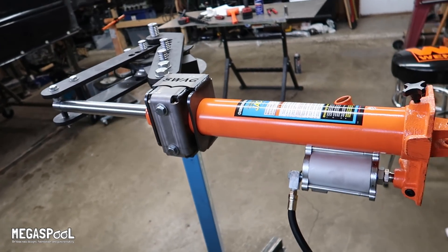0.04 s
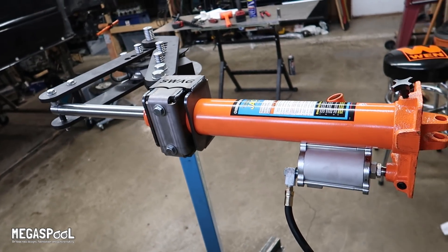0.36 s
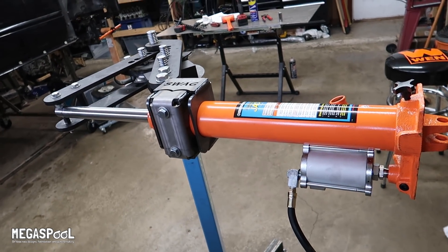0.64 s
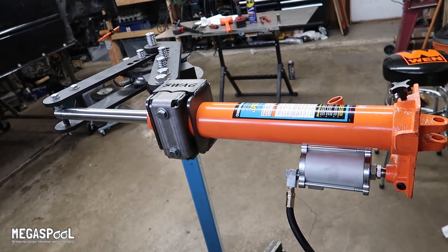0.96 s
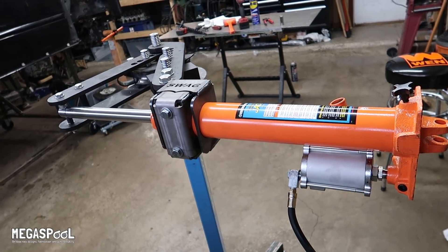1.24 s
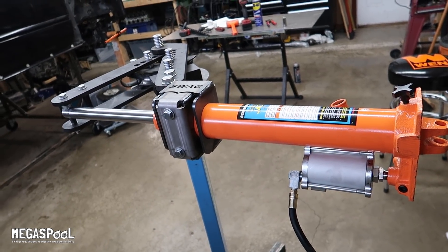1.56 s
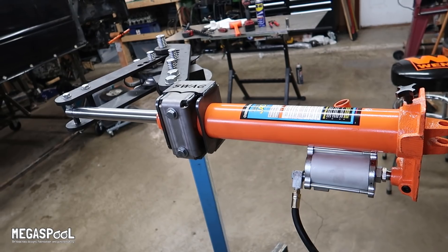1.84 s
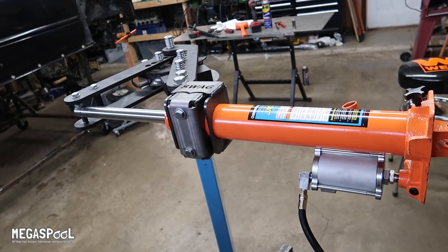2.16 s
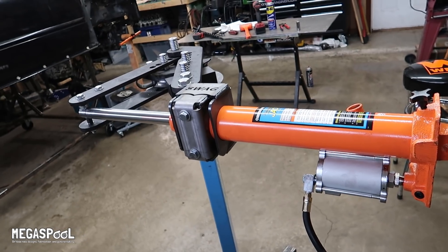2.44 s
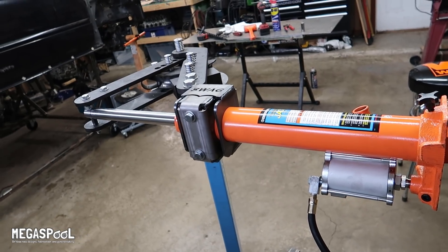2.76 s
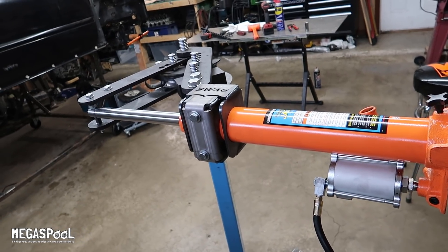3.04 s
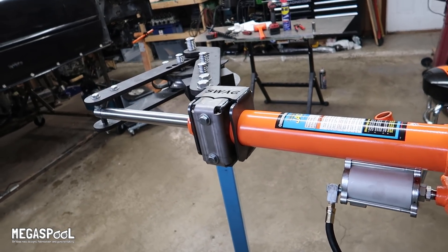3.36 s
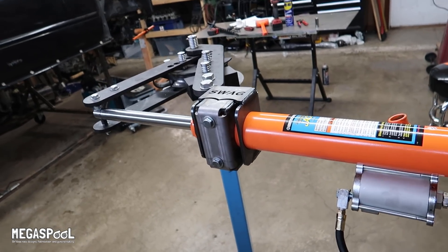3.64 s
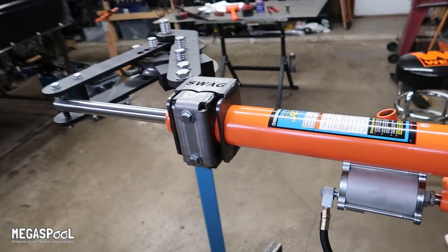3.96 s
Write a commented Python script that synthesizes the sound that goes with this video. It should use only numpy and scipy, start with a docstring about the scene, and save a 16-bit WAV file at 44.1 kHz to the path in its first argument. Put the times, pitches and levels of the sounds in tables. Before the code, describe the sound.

An air-driven hydraulic pump is already running loudly close by, at nearly ten strokes a second, each a sharp hiss of air with thumps and a small knock. It slows very slightly, echoing in a garage, and stops abruptly at about 3.6 seconds. The room rings out briefly. Near 3.8 seconds a small steel part pings faintly, followed by a soft rustle over a quiet workshop hum.

```python
"""Air-driven hydraulic pump in a garage

The pump pushes a tube bender's ram at nearly ten strokes a second, slowing a little under load. Each stroke
dumps its air with a sharp hiss and a thump; the piston flies back with a second thump, a rising gulp and a
knock. The pump stops, the room rings out, and a small steel part pings over the workshop's hum, while faint
midrange noise slowly rises."""
import sys
import numpy as np
from scipy import signal
from scipy.fft import rfft, irfft
from scipy.io import wavfile

SR = 44100
rng = np.random.default_rng(int(sys.argv[2]) if len(sys.argv) > 2 else 0)


def generate_wav(sig):
    """Save sig (samples, or channels by samples) to the path in sys.argv[1] as 16-bit PCM at SR."""
    pcm = np.round(np.clip(np.atleast_2d(sig).T, -1, 1) * 32767).astype(np.int16)
    wavfile.write(sys.argv[1], SR, pcm)


N = 176400
LEAD = SR // 4  # run-in samples: the pump is already going
T = np.arange(-LEAD, N) / SR
HZ = np.maximum(np.fft.rfftfreq(len(T), 1 / SR), 1)

STROKES = np.arange(-2, 35)
STROKE_ZERO_S, PERIOD_S, SLOWING_S_PER_STROKE = .0124, .10224, .000082

# Loudness of the hiss and the thumps over time.
# Each row: time in seconds, hiss gain in dB, thump gain in dB.
HISS_THUMP_LEVELS = [(0, 1.6, -1.8), (.45, 1.6, -.4), (.8, .9, 1), (1.4, -.4, .1), (2.1, 0, .1),
                     (2.7, .3, .1), (3.45, -.5, 0), (3.55, -.1, .8)]
# Exhaust jet spectrum. Each row: frequency in Hz, relative density in dB.
JET_SPECTRUM = [(150, -11), (400, -4.5), (750, -2.3), (1100, -.5), (1450, -2), (2000, -.5), (3000, -3.8),
                (4200, -3.6), (5500, -7.3), (7000, -10.5), (10000, -10), (13000, -11.5), (15500, -22)]
# Exhaust port resonances. Each row: frequency in Hz, width in Hz, gain in dB.
PORT_MODES = [(1660, 200, -4.5), (2230, 170, -3), (3800, 280, -6), (8550, 340, -8)]
# Gulp strength, growing with load. Each row: time in seconds, gain in dB.
GULP_GAIN = [(0, -1), (1.5, .3), (3.48, .3), (3.55, 2.5)]
# Frame and room resonances. Each row: frequency in Hz, gain in dB, T60 in seconds, polarity.
FRAME_ROOM_MODES = [(29, 8, .4, 1), (68, 10.5, .6, 1), (105, -6, .12, -1), (141, 12, .26, 1),
                    (222, -3, .6, 1), (255, 9, .17, 1), (301, 5, .6, -1), (339, 8, .65, 1),
                    (420, 4, .18, 1), (508, 2, .6, -1), (566, 7, .45, 1), (700, 7, .45, -1),
                    (879, 17, .4, 1)]
# Floor and wall echoes. Each row: delay in seconds, gain in dB.
WALL_ECHOES = [(.0045, -13), (.0107, -11.5), (.0358, -12), (.0455, -13.7)]
# Reverb decay. Each row: frequency in Hz, T60 in seconds.
REVERB_DECAY = [(150, .55), (350, .65), (700, .6), (2000, .5), (5000, .52), (9000, .47), (14000, .36)]
# Reverb colour. Each row: frequency in Hz, gain in dB.
REVERB_GAIN = [(150, -3), (500, .5), (1000, -.5), (2000, -.3), (4000, .9), (7000, -.7), (13000, -4.5)]
# Reverb width. Each row: frequency in Hz, left-right correlation.
REVERB_CORRELATION = [(250, 1), (700, 1), (1200, .985), (2000, .88), (3000, .72), (5000, .2), (7500, -.15),
                      (11000, -.55), (15000, -.55)]
# Workshop noise spectrum. Each row: frequency in Hz, relative density in dB.
WORKSHOP_SPECTRUM = [(30, -2), (120, -3), (400, -2), (1100, -1), (2200, -10), (4500, -20), (9000, -30),
                     (15000, -36)]
# Pings of the steel part. Each row: start in seconds, relative level in dB.
STEEL_PINGS = [(3.808, -9), (3.824, 0), (3.868, -1)]


def from_db(db):
    """Decibels to gain."""
    return 10 ** (np.asarray(db) / 20)


def at_hz(table, hz):
    """Table lookup on a log-frequency axis."""
    table_hz, values = np.transpose(table)
    return np.interp(np.log(hz), np.log(table_hz), values)


def noise(gain):
    """Unit-rms noise shaped by a gain per frequency."""
    x = irfft(rfft(rng.standard_normal(len(T))) * gain, len(T))
    return x / x.std()


def waver(corner_hz):
    """Unit-rms random motion, mostly below the corner."""
    return noise(1 / (1 + (HZ / corner_hz) ** 2))


def fade(age, t60_s):
    """Exponential decay from age zero, silent before."""
    return (age >= 0) * np.exp(-np.log(1000) * np.maximum(age, 0) / t60_s)


def swell(age, rise_s, t60_s):
    """Rounded attack, exponential decay."""
    return (1 - np.exp(-np.maximum(age, 0) / rise_s)) * fade(age, t60_s)


def resonate(x, hz, width_hz):
    """Two-pole resonance, unity peak gain."""
    r = np.exp(-np.pi * width_hz / SR)
    feedback = [1, -2 * r * np.cos(2 * np.pi * hz / SR), r * r]
    return signal.lfilter(np.array([1, 0, -1]) * (1 - r * r) / 2, feedback, x + 1e-18)


def stereo(mid, side, correlation):
    """Two unrelated signals to a left-right pair of given correlation."""
    return np.sqrt((1 + correlation) / 2) * mid + np.sqrt((1 - correlation) / 2) * np.array([side, -side])


def delayed(x, delay_s):
    """Fractional-sample delay."""
    hz = np.fft.rfftfreq(2 * len(T), 1 / SR)
    return irfft(rfft(x, 2 * len(T)) * np.exp(-2j * np.pi * hz * delay_s))[:len(T)]


def every_stroke(shape, scatter_db):
    """Repeat shape(age in seconds) at each piston stroke."""
    starts_s = STROKE_ZERO_S + PERIOD_S * STROKES + SLOWING_S_PER_STROKE * STROKES ** 2 / 2
    gains = from_db(scatter_db * rng.standard_normal(len(STROKES)))
    kicks = np.zeros(len(T))
    kicks[np.round(starts_s * SR).astype(int) + LEAD] = gains
    return signal.fftconvolve(kicks, shape(T[:2 * LEAD]))[LEAD:LEAD + len(T)]


def valve_flow(age):
    """Air flow of one stroke: the valve snaps open, holds, and the cylinder empties."""
    early_s, attack_s, hold_s = .004, .0095, .012
    open_s = age + early_s
    opening = np.clip(open_s / attack_s, 0, 1)
    emptying = fade(np.maximum(open_s - attack_s - hold_s, 0), t60_s=.085)
    crack = from_db(-6) * fade(age - .0038, t60_s=.009)
    return opening * emptying + crack


def exhaust():
    """Turbulent jet, gated by the valve and coloured by the port; spits treble at full flow."""
    low_cut_hz, spit_edge_hz = 100, 5500
    flutter = from_db(2.2 * waver(corner_hz=900))
    flutter /= np.sqrt(np.mean(flutter ** 2))
    flow = every_stroke(valve_flow, scatter_db=.15)
    colour = from_db(at_hz(JET_SPECTRUM, HZ))
    jet = noise(colour * HZ ** 2 / (HZ ** 2 + low_cut_hz ** 2)) * flutter * flow
    port = sum(from_db(db + .5 * waver(corner_hz=25)) * resonate(jet, hz, width_hz)
               for hz, width_hz, db in PORT_MODES)
    spit = noise(colour / (1 + (spit_edge_hz / HZ) ** 4)) * flutter * np.minimum(flow, 1) ** 3
    return from_db(-18.6) * (jet + port) + from_db(-27) * spit


def thump(age, hz, rise_s, t60_s):
    """Heavily damped swing of air."""
    return swell(age, rise_s, t60_s) * np.sin(2 * np.pi * hz * age)


def stroke_thumps(age):
    """The exhaust pushes air out; the return draws it in."""
    push = from_db(-5) * thump(age - .0007, hz=171, rise_s=.0036, t60_s=.032)
    draw = from_db(-8.4) * thump(age - .0257, hz=190, rise_s=.0028, t60_s=.0275)
    return push - draw


def gulp(age):
    """The air chamber shrinks as the piston returns, so its note rises."""
    delay_s, start_hz, end_hz, glide_s = .0244, 215, 784, .013
    age = age - delay_s
    hz = (age > 0) * (end_hz + (start_hz - end_hz) * np.exp(-np.maximum(age, 0) / glide_s))
    return from_db(-17.5) * swell(age, rise_s=.0007, t60_s=.095) * np.sin(2 * np.pi * np.cumsum(hz) / SR)


def seat_knock(age):
    """The piston seats with a short knock."""
    return -from_db(-20) * thump(age - .0317, hz=500, rise_s=.001, t60_s=.02)


def piston():
    """Two thumps, a gulp and a knock per stroke."""
    thumps = every_stroke(stroke_thumps, scatter_db=.2)
    gulps = every_stroke(gulp, scatter_db=.6) * from_db(np.interp(T, *np.transpose(GULP_GAIN)))
    return thumps + gulps + every_stroke(seat_knock, scatter_db=1)


def boom(thumps):
    """Frame and room resonances ring on between strokes."""
    return sum(polarity * from_db(db) * resonate(thumps, hz, width_hz=np.log(1000) / np.pi / t60_s)
               for hz, db, t60_s, polarity in FRAME_ROOM_MODES)


def garage_reverb(x):
    """Diffuse stereo tail, each band dying at its own rate."""
    age = np.arange(SR // 2) / SR
    edges_hz = np.geomspace(90, 17000, 16)
    white = rng.standard_normal((2, 2, len(age)))
    response = 0
    for k, band in enumerate(zip(edges_hz, edges_hz[1:])):
        hz = np.sqrt(band[0] * band[1])
        tail = swell(age - .004, rise_s=.004, t60_s=at_hz(REVERB_DECAY, hz))
        tail *= from_db(at_hz(REVERB_GAIN, hz)) / np.linalg.norm(tail)
        mid, side = signal.sosfilt(signal.butter(2, band, "band", fs=SR, output="sos"), white[k % 2])
        response += tail * stereo(mid, side, at_hz(REVERB_CORRELATION, hz))
    return signal.fftconvolve(x[None], response, axes=1)[:, :len(T)]


def drifting_reverb(x, drift_hz=.4):
    """Two reverb patterns trade places as the listening point wanders."""
    turn = 2 * np.pi * drift_hz * T
    return garage_reverb(x * np.cos(turn)) + garage_reverb(x * np.sin(turn))


def workshop_hum():
    """Dull noise, alike on both sides in the bass, with two faint steady tones."""
    colour = from_db(at_hz(WORKSHOP_SPECTRUM, HZ))
    hum = sum(from_db(rms_db) * np.sqrt(2) * np.sin(2 * np.pi * hz * T)
              for hz, rms_db in [(942, -62), (1346, -56)])
    return from_db(-48) * stereo(noise(colour), noise(colour * HZ), correlation=.9) + hum


def steel_ping(ring_hz=5281):
    """A soft tick, and a small steel part rings as it settles."""
    tick_noise = noise(np.sqrt(from_db(at_hz(JET_SPECTRUM, HZ))))
    tick = from_db(-42) * swell(T - STEEL_PINGS[0][0], rise_s=.002, t60_s=.13) * tick_noise
    envelope = sum(from_db(db) * swell(T - start_s, rise_s=.008, t60_s=.13) for start_s, db in STEEL_PINGS)
    return tick + from_db(-40.5) * envelope * np.sin(2 * np.pi * ring_hz * T)


def rising_noise(start_s=3.89):
    """Faint midrange noise swells up once the pump has stopped."""
    band = resonate(rng.standard_normal(len(T)), hz=1000, width_hz=700)
    return from_db(-47.5) * swell(T - start_s, rise_s=.008, t60_s=1.5) * band / band.std()


def scene():
    """Pump close by, slightly right, in the garage."""
    times_s, hiss_db, thump_db = np.transpose(HISS_THUMP_LEVELS)
    bright = exhaust() * from_db(np.interp(T, times_s, hiss_db)) + steel_ping()
    thumps = piston() * from_db(np.interp(T, times_s, thump_db))
    bright_left = from_db(-.5) * delayed(bright, delay_s=.000029)
    near = np.array([bright_left, bright]) + thumps + boom(thumps)
    echo_send = thumps + from_db(-2) * bright
    echoes = sum(from_db(db) * delayed(echo_send, delay_s) for delay_s, db in WALL_ECHOES)
    reverb = drifting_reverb(bright + from_db(-12) * thumps)
    return (near + echoes + reverb + rising_noise() + workshop_hum())[:, LEAD:]


def record(dry):
    """Subsonic cut, soft clip, steep top cut."""
    low_cut_hz, ceiling, stopband_hz = 12, .95, 16200
    thinned = signal.sosfilt(signal.butter(1, low_cut_hz, "high", fs=SR, output="sos"), dry)
    rounded = ceiling * np.tanh(thinned / ceiling)
    return signal.sosfilt(signal.cheby2(14, 70, stopband_hz, fs=SR, output="sos"), rounded)


dry = scene()
out = record(dry)
generate_wav(out)
```